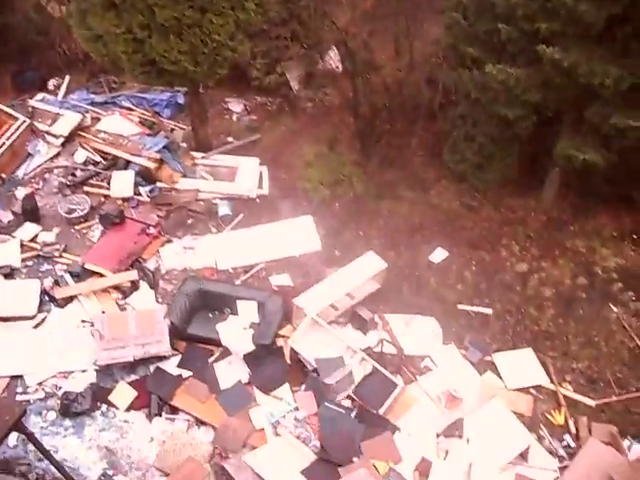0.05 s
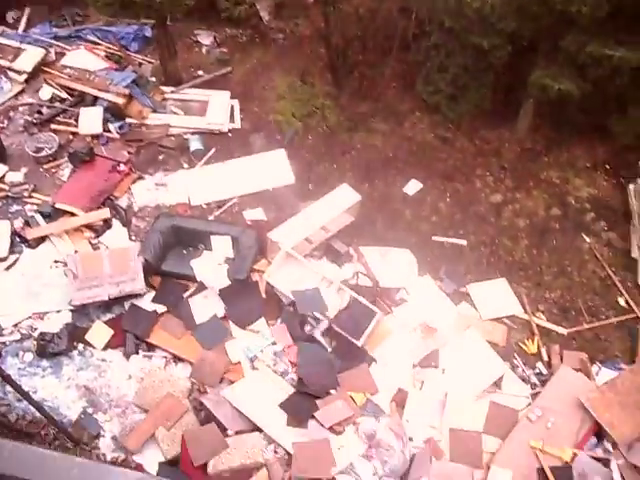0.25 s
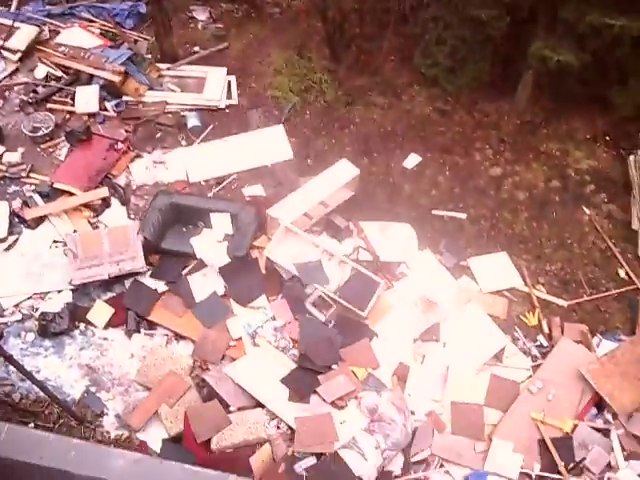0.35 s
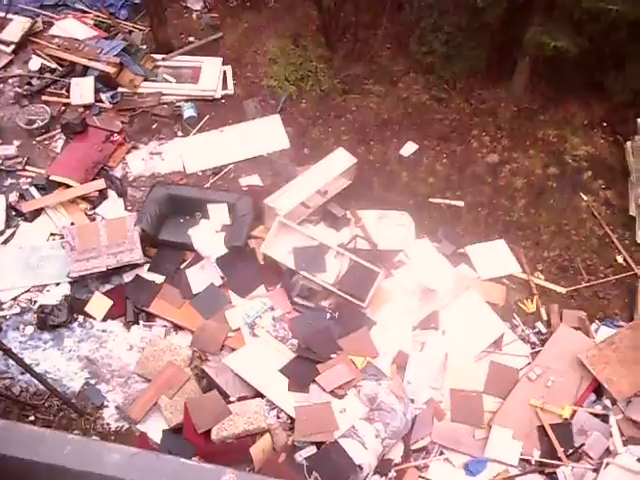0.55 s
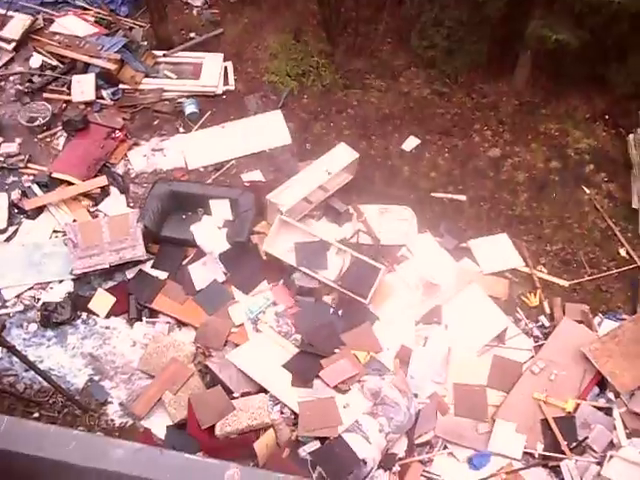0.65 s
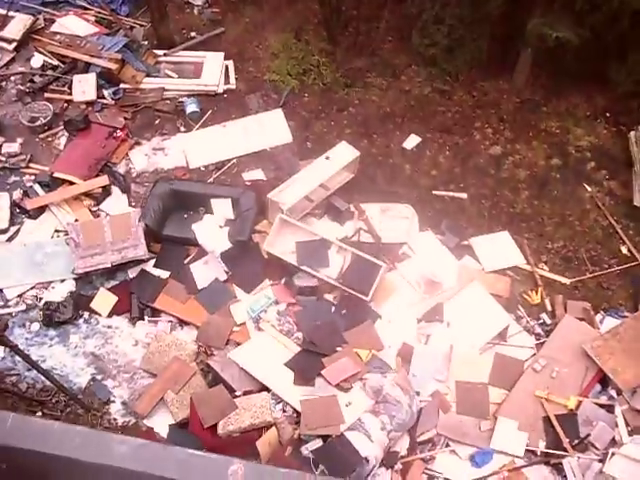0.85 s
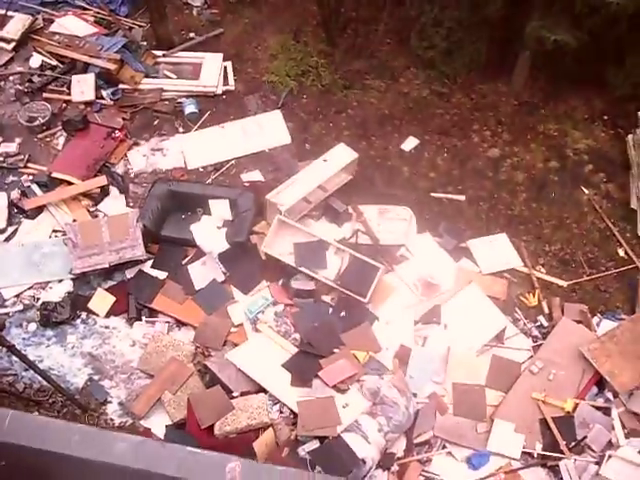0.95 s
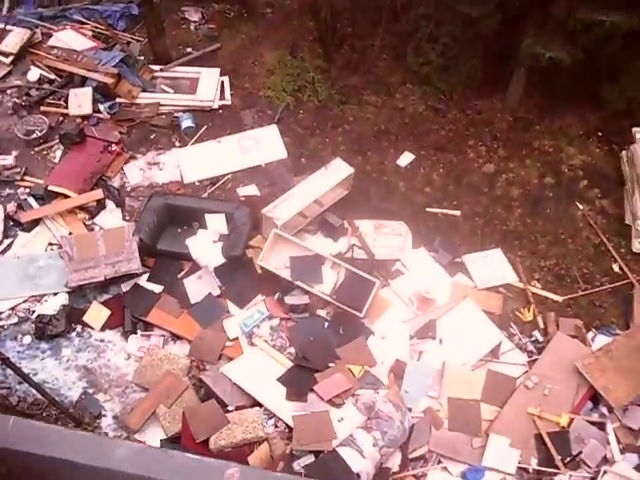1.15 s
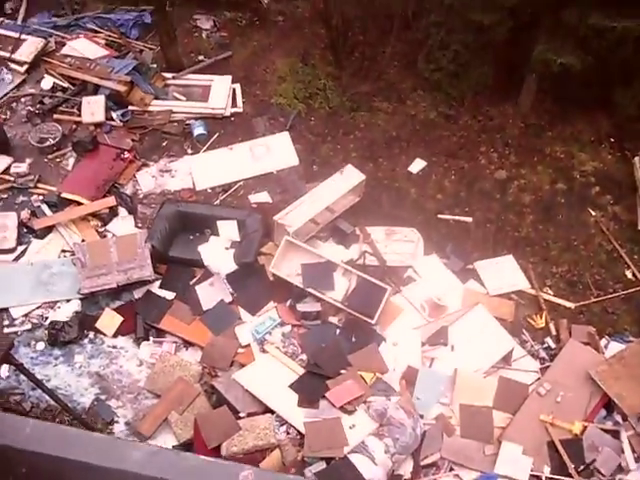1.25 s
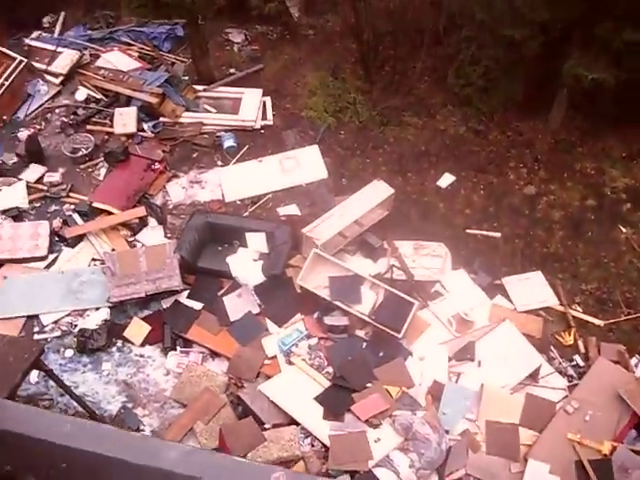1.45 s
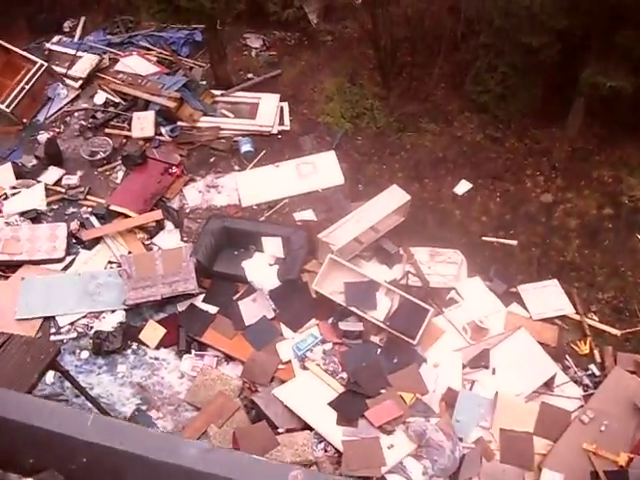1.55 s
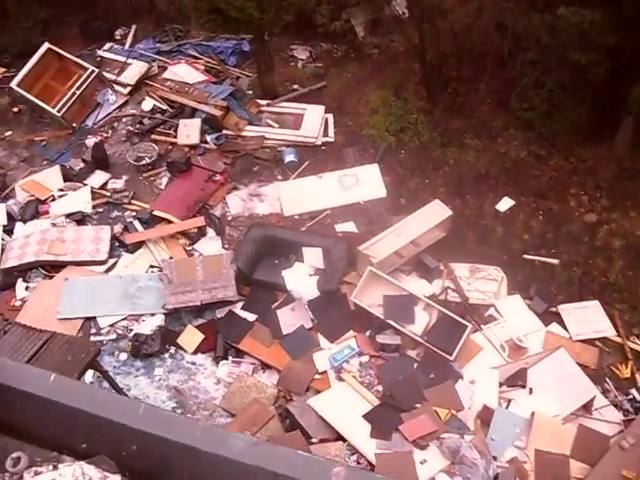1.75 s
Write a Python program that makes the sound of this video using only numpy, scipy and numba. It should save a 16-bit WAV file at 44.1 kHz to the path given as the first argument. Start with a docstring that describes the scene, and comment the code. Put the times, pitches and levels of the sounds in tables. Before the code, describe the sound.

A heavy monitor smashes onto a rubbish heap with a harsh, overloaded burst of shards and splinters, hollow booms and board knocks; debris slides and ticks to rest outdoors, heard from above on a small microphone.

```python
"""A heavy monitor lands on a rubbish heap, heard from a window above: shards and splinters burst out as
thousands of short damped sines and overload the small microphone. A hollow casing booms and boards knock
as ringing modes; debris slides and settles in clusters of ticks; one glass piece clinks and bounces.
Light wind rumbles on the microphone over a quiet outdoor hiss, both shaped noise; a short echo follows."""
import sys
import numpy as np
from scipy import signal
from scipy.fft import rfft, irfft
from scipy.io import wavfile
from numba import njit

SR = 44100
rng = np.random.default_rng(int(sys.argv[2]) if len(sys.argv) > 2 else 0)


def elevation(decibels):
    """Turn decibel levels (scalar or array-like) into linear amplitude ratios."""
    levels = np.asarray(decibels, float)
    return 10 ** (levels / 20)


def int16_out(signal):
    """Quantize to a 16-bit WAV file."""
    q = np.round(np.clip(np.atleast_2d(signal).T, -1, 1) * 32767)
    wavfile.write(sys.argv[1], SR, q.astype(np.int16))


N = 79380  # samples, 1.8 s

# outdoor hiss spectrum: freq_hz, relative_level_db (per Hz)
HISS_COLOUR = [(88, -1), (150, -2.5), (275, -8), (810, -7), (1720, -14.5), (2100, -18), (4710, -25),
               (9810, -30.5), (12000, -45), (15600, -80), (22000, -120)]
# hiss level over time: time_s, relative_level_db
HISS_SWELL = [(0, 3), (.2, 4.5), (.9, 3.5), (1.15, 2.5), (1.3, 2.5), (1.8, -0.5)]
# wind level over time: time_s, relative_level_db
WIND_LEVEL = [(0.0, -36.5), (0.11, -36.5), (0.29, -30.5), (0.53, -47), (0.65, -41.5), (0.762, -45.5),
              (0.962, -49), (1.554, -47.5), (1.8, -43.5)]
# wind rumble spectrum: freq_hz, relative_level_db
WIND_COLOUR = [(8, 14), (25, -4), (60, -6), (150, -12.5), (400, -55), (20000, -76)]
HISS_DB, WIND_DB = -47.5, 4.5

# force of the landing and the slide after it: time_s, shards_db, splinters_db
SLIDE_FORCE = [(0.206, -8.5, -11), (0.212, -14.5, -9), (0.222, -2, -15.5), (0.252, -8.5, -13),
               (0.288, -13.5, -13.5), (0.312, -9, -11), (0.34, -18, -37), (0.35, -14.5, -5),
               (0.372, -21.5, -30), (0.394, -17.5, -16.5), (0.406, -21.5, -21), (0.544, -32, -28),
               (0.558, -26, -23.5), (0.608, -34.5, -31.5), (0.648, -26.5, -34), (0.656, -35.5, -20.5),
               (0.68, -28, -35), (0.87, -49.5, -39.5)]
# spectrum of the shards: freq_hz, relative_level_db
SHARD_COLOUR = [(590, -29), (1000, 4.5), (1200, -8), (1360, -5.5), (1550, -18), (2020, -2), (3550, -6.5),
                (7720, -23), (9470, -16), (11500, -40), (15000, -69), (22000, -120)]
# spectrum of the board splinters: freq_hz, relative_level_db
SPLINTER_COLOUR = [(79, -30), (135, 5.5), (247, -25), (314, -2), (438, -14), (482, -5), (697, -8.5),
                   (809, -10), (1100, -12.5), (1430, -43), (2420, -120)]
# the first blow is stronger than the microphone can carry
OVERLOAD_DB, OVERLOAD_FROM_S, OVERLOAD_END_S, OVERLOAD_FADE_S = 7.5, 0.2115, 0.286, 0.017
SCATTER_DB = 1.0  # mean excess of a piece's level

# booms of the hollow casing: start_s, level_db, pitch_hz, t60_s
CASING_BOOMS = [(.219, -5.5, 67, 0.11), (.302, -11, 108, .15), (.3515, -3, 104.9, 0.25),
                (.436, -18, 113, 0.14), (.528, -24, 102, 0.31), (.583, -21, 103, 0.084),
                (.64, -30.5, 126, 0.09), (.742, -31, 86, 0.23), (1.034, -26.5, 110.3, 0.24),
                (1.09, -35.5, 110, 0.21)]
# modes of the casing: freq_ratio, relative_level_db
CASING_MODES = [(1.001, 2), (1.199, -13)]
# knocks on boards: start_s, level_db, lowest_mode_hz, t60_s
BOARD_KNOCKS = [(0.31, -13, 329.5, 0.098), (.347, -8.5, 815, 0.081), (.375, -15, 333.3, 0.15),
                (0.449, -26, 331.4, 0.2), (.651, -28.5, 323, 0.13), (0.741, -35, 325, 0.13),
                (1.0334, -12.5, 504, 0.057), (1.0343, -20, 695, 0.035), (1.288, -37, 367, 0.077)]
# modes of a board: freq_ratio, relative_level_db, t60_share
BOARD_MODES = [(1, 2.5, 0.86), (1.3, -4, 0.79), (1.63, -5.5, 0.95), (2.05, -12, 0.99), (2.5, -17, 0.27)]
CASING_PUSH_T60_S, BOARD_PUSH_T60_S, GLASS_PUSH_T60_S = 0.013, 0.0056, 0.0048

# single pieces of debris that drop: start_s, relative_level_db, pitch_hz, t60_s, treble_fall_db_per_oct
DEBRIS_DROPS = [(0.348, -3, 2080, 0.09, 22), (0.557, -18, 2170, 0.09, 30), (0.7048, -23, 1870, 0.095, 20),
                (0.7925, -22.5, 2870, 0.095, 12), (0.822, -29, 2210, 0.073, 8),
                (0.8773, -26, 2030, 0.12, 1), (0.9012, -22.5, 2336, 0.086, 8), (0.9519, -28, 2270, 0.12, 1),
                (0.9605, -24.5, 2570, 0.1, 5), (0.9726, -18, 2200, 0.083, 7), (0.9865, -29, 2180, 0.09, 9),
                (1.0328, -19.5, 2204, 0.09, 1.5), (1.0478, -25, 2150, 0.09, 1),
                (1.0798, -36, 2370, 0.09, 1), (1.1237, -34, 2090, 0.086, 4),
                (1.1544, -36.5, 2450, 0.082, 0), (1.2112, -29.5, 2250, 0.1, 2.5),
                (1.2685, -31.5, 2430, 0.096, 21), (1.29, -20, 2560, 0.08, 1.5),
                (1.4001, -36, 2010, 0.11, -1.5), (1.4284, -44, 3070, 0.09, -1),
                (1.4707, -25, 2350, 0.081, 2), (1.4872, -37, 2680, 0.084, 2),
                (1.5895, -33.5, 2300, 0.083, 4), (1.6121, -43, 2070, 0.074, 8),
                (1.709, -31.5, 2060, 0.081, 4)]
DEBRIS_DB, DEBRIS_BASS_FALL_DB_PER_OCT, DEBRIS_PITCH_BOOST_DB = -9.5, 15.5, 5.5

# bounces of the glass piece: start_s, level_db
GLASS_BOUNCES = [(.9012, -22), (.9085, -37.5), (.918, -47)]
# modes of the glass piece: freq_hz, relative_level_db, t60_s
GLASS_MODES = [(2363, -6, .05), (2562, -20, .08), (3623, 0, .075), (3898, -8, .053), (5739, -14, .09),
               (7063, -16, .1), (7640, -23, .07), (9500, -24, .04)]

ECHO_DB, ECHO_T60_S, ECHO_DELAY_S = -16, 0.15, 0.006
TOP_HZ, CLIP = 12320, 0.72  # microphone limits


@njit
def grains(start, hz, t60, size):
    """Sum of damped sines, each a rotating, shrinking complex number cut off at its t60."""
    out = np.zeros(N)
    for j in range(len(start)):
        turn = np.exp(2j * np.pi * hz[j] / SR - np.log(1000) / (t60[j] * SR))
        z = size[j] + 0j
        for i in range(start[j], min(N, start[j] + int(t60[j] * SR))):
            out[i] += z.imag
            z *= turn
    return out


def ring(start_s, hz, t60_s, db, sign=1.0):
    """Damped sines from broadcast times, pitches, decays and levels."""
    gain = sign * elevation(np.asarray(db))
    start_s, hz, t60_s, gain = (np.ravel(v) * 1.0 for v in np.broadcast_arrays(start_s, hz, t60_s, gain))
    return grains((start_s * SR).astype(np.int64), np.clip(hz, 20, 0.45 * SR), t60_s, gain)


def at(table, x, col, log=False):
    """Table column at x by straight lines, over log x if asked."""
    a = np.array(table, float)
    if log:
        return np.interp(np.log(x), np.log(a[:, 0]), a[:, col])
    return np.interp(x, a[:, 0], a[:, col])


def coloured(colour):
    """Noise of rms 1 with the spectrum of a freq_hz, level_db table."""
    hz = np.arange(N // 2 + 1) * SR / N + 1  # +1 avoids log(0)
    noise = irfft(rfft(rng.standard_normal(N)) * elevation(at(colour, hz, 1, True)), N)
    return noise / np.std(noise)


def air():
    """Outdoor hiss, and wind rumble on the microphone: shaped noises of slowly varying level."""
    t = np.arange(N) / SR
    hiss = elevation(HISS_DB + at(HISS_SWELL, t, 1)) * coloured(HISS_COLOUR)
    rumble = elevation(WIND_DB + at(WIND_LEVEL, t, 1)) * coloured(WIND_COLOUR)
    return hiss + rumble


def rubble(colour, force_col, cycles, gain_db, count):
    """Many small pieces strike each other, each ringing for a few cycles, as hard as the slide is."""
    u = rng.random((count, 4)).T
    hz_lo, hz_hi = colour[1][0], colour[-3][0]
    first_s, last_s = SLIDE_FORCE[0][0], SLIDE_FORCE[-1][0]
    start_s = first_s + u[0] * (last_s - first_s)
    hz = hz_lo * (hz_hi / hz_lo) ** u[1]
    fade = np.clip((OVERLOAD_END_S - start_s) / OVERLOAD_FADE_S, 0, 1)
    force_db = at(SLIDE_FORCE, start_s, force_col) + OVERLOAD_DB * (start_s > OVERLOAD_FROM_S) * fade
    # 20 log10: high pieces ring shorter and lie sparser per Hz
    colour_db = at(colour, hz, 1, True) + 20 * np.log10(hz / hz_lo)
    scatter_db = -SCATTER_DB * np.log(1 - u[2])
    return ring(start_s, hz, cycles / hz, force_db + colour_db + scatter_db + gain_db, np.sign(u[3] - 0.5))


def casing_booms():
    """The hollow casing rings its modes; a soft push, an opposed short ring, makes each boom swell."""
    start_s, level_db, pitch_hz, t60_s = np.array(CASING_BOOMS, float).T
    out = 0
    for ratio, mode_db in CASING_MODES:
        hz, db = ratio * pitch_hz, level_db + mode_db
        out = out + ring(start_s, hz, t60_s, db, -0.99) + ring(start_s, hz, CASING_PUSH_T60_S, db)
    return out


def board_knocks():
    """Each knock rings all board modes, its onset softened by an opposed short ring."""
    knocks, modes = np.array(BOARD_KNOCKS, float), np.array(BOARD_MODES, float)
    start_s = knocks[:, :1]
    db = knocks[:, 1:2] + modes[:, 1]
    hz = knocks[:, 2:3] * modes[:, 0]
    t60_s = knocks[:, 3:] * modes[:, 2]
    return ring(start_s, hz, t60_s, db, -1.0) + ring(start_s, hz, BOARD_PUSH_T60_S, db)


def debris():
    """Each piece rattles in a quick cluster of ticks, boosted around its own pitch."""
    out = 0
    for start_s, level_db, pitch_hz, t60_s, fall_db in DEBRIS_DROPS:
        u = rng.random((260, 3)).T
        late_s = u[0] ** 1.5 * t60_s * 0.93
        hz = 800 * (10500 / 800) ** u[2]
        octs = np.log2(hz / pitch_hz)
        colour_db = np.where(octs > 0, -fall_db * octs, DEBRIS_BASS_FALL_DB_PER_OCT * octs)
        colour_db = colour_db + DEBRIS_PITCH_BOOST_DB * (abs(octs) < 0.12)
        db = level_db + DEBRIS_DB + colour_db - 60 * late_s / t60_s
        out = out + ring(start_s + late_s, hz, 14 / hz, db, np.sign(u[1] - 0.5))
    return out


def glass_clinks():
    """A glass piece bounces, ringing its modes with onsets softened by an opposed short ring."""
    hz, mode_db, t60_s = np.array(GLASS_MODES, float).T
    out = 0
    for start_s, level_db in GLASS_BOUNCES:
        db = level_db + mode_db
        out = out + ring(start_s, hz, t60_s, db) - ring(start_s, hz, GLASS_PUSH_T60_S, db)
    return out


def echo(dry):
    """The heap and the house front answer with a dulled, decaying noise tail."""
    t = np.arange(SR) / SR
    noise = signal.lfilter([0.4], [1, -0.6], rng.standard_normal(SR))
    tail = noise * elevation(-60 * t / ECHO_T60_S) * (t > ECHO_DELAY_S)
    tail = tail / np.sqrt(np.sum(tail ** 2))
    return elevation(ECHO_DB) * signal.fftconvolve(dry, tail)[:N]


def scene():
    """Landing, slide and single pieces, with their echo, over the outdoor air."""
    shards = rubble(SHARD_COLOUR, 1, cycles=9, gain_db=-13.5, count=16000)
    splinters = rubble(SPLINTER_COLOUR, 2, cycles=12.4, gain_db=-13, count=1800)
    heap = shards + splinters + casing_booms() + board_knocks() + debris() + glass_clinks()
    return (heap + echo(heap) + air())[None]


def band_limit(x):
    """A steep low-pass at the top of the band."""
    return signal.sosfilt(signal.butter(12, 16490, fs=SR, output="sos"), x)


def record(dry):
    """The small recorder cuts the top, clips the loudest part and dulls the clipping's fizz."""
    low_pass = signal.cheby2(6, 32, TOP_HZ, fs=SR, output="sos")
    clipped = np.clip(signal.sosfilt(low_pass, dry), -CLIP, CLIP)
    hz = np.arange(N // 2 + 1) * SR / N
    shelf_db = -9 / (1 + np.exp((12300 - hz) / 300))
    mix = irfft(rfft(clipped) * elevation(shelf_db), N)
    return band_limit(mix)


dry = scene()
out = record(dry)
int16_out(out)
```